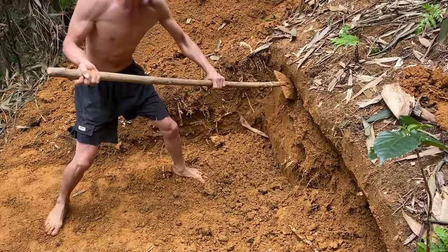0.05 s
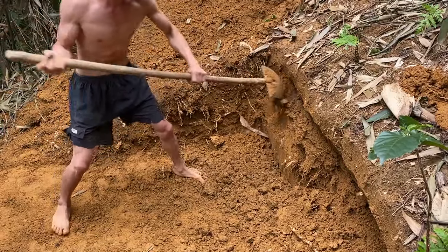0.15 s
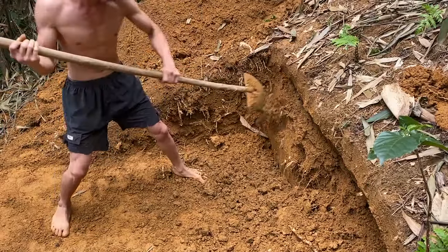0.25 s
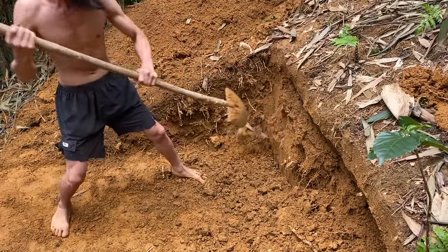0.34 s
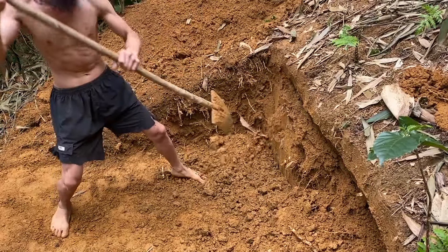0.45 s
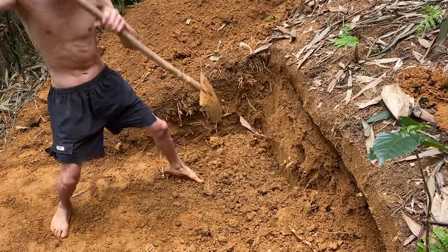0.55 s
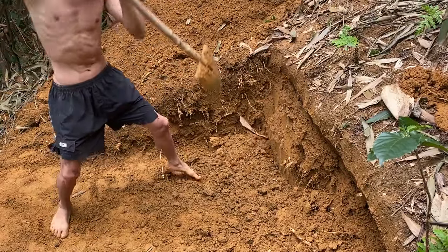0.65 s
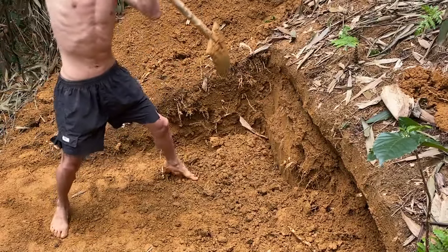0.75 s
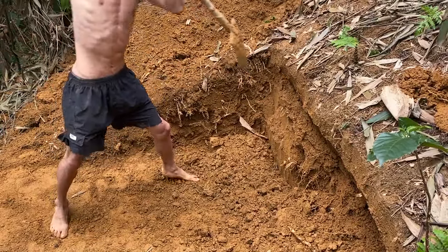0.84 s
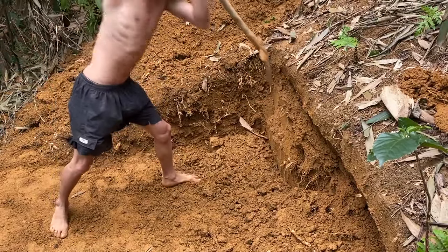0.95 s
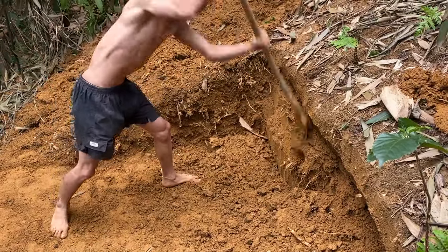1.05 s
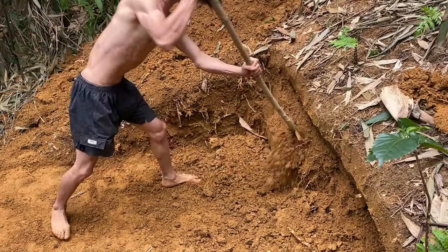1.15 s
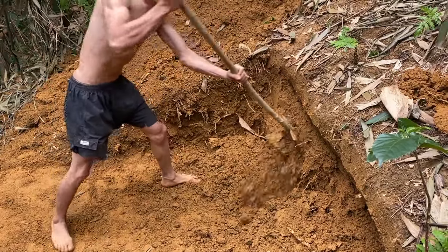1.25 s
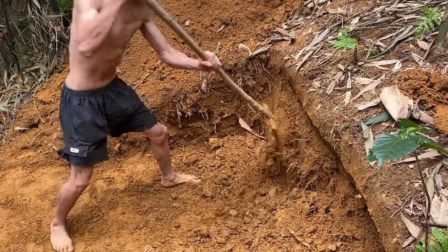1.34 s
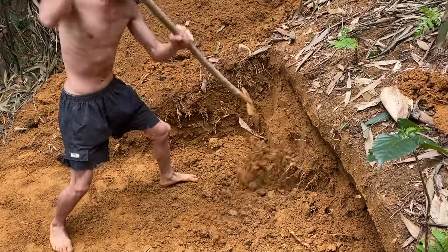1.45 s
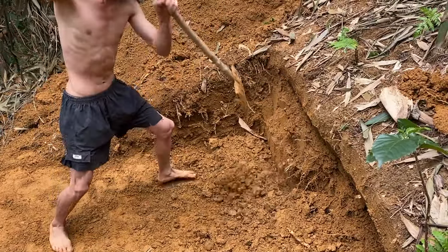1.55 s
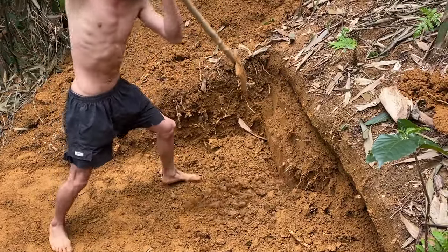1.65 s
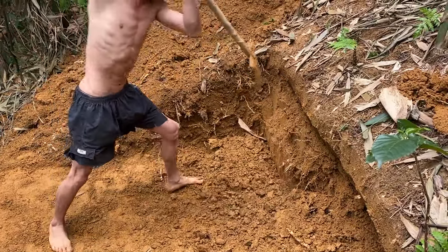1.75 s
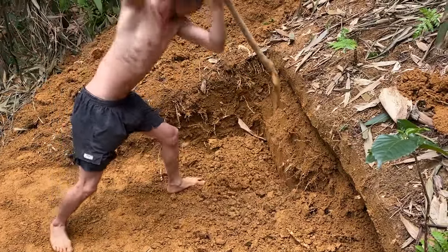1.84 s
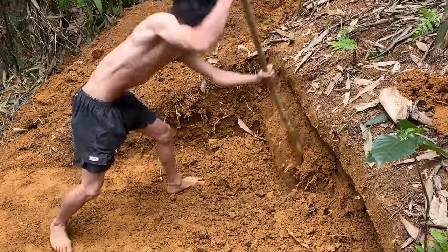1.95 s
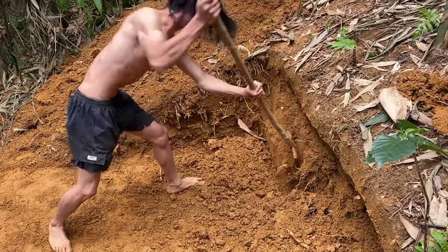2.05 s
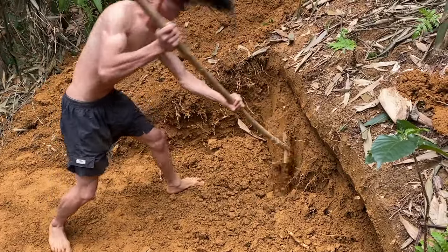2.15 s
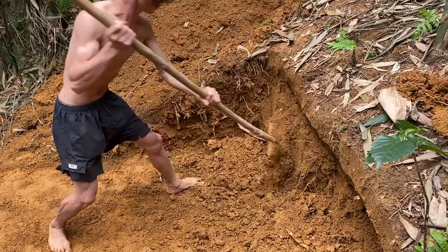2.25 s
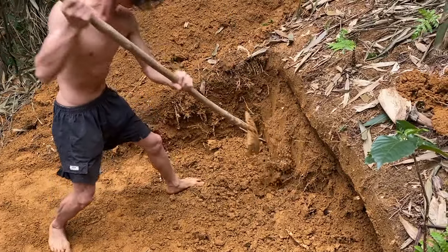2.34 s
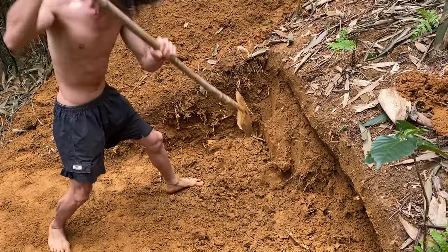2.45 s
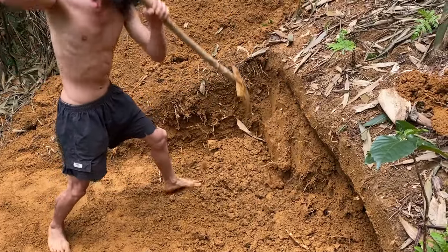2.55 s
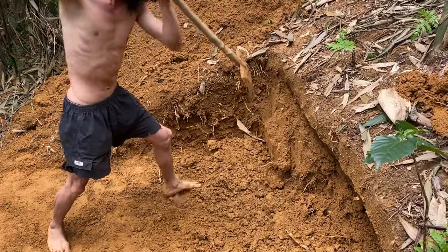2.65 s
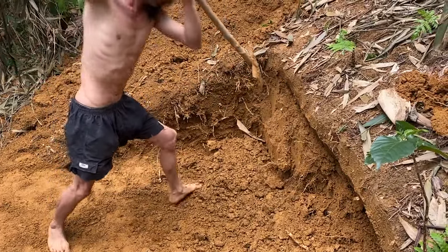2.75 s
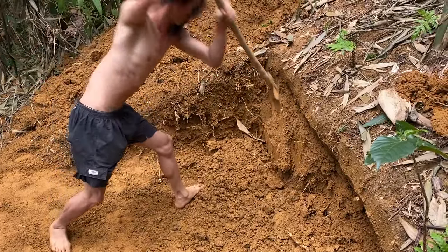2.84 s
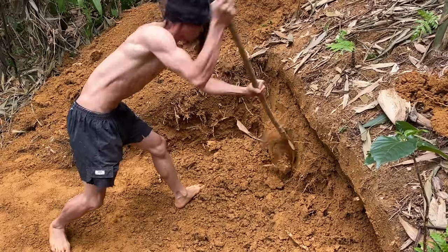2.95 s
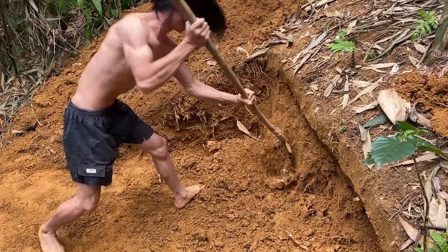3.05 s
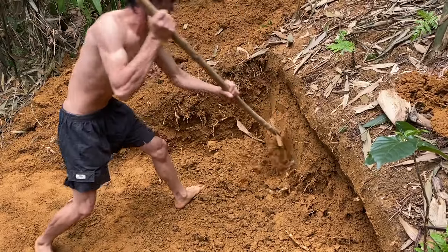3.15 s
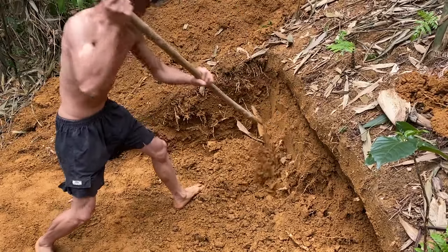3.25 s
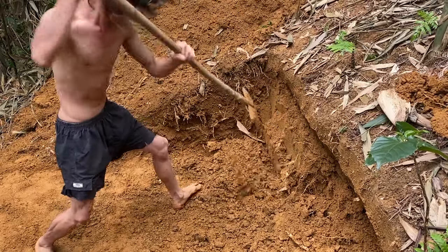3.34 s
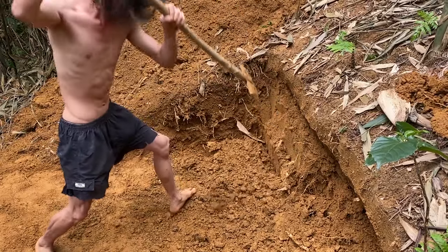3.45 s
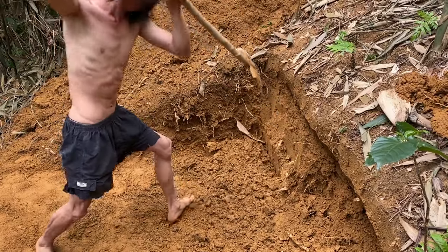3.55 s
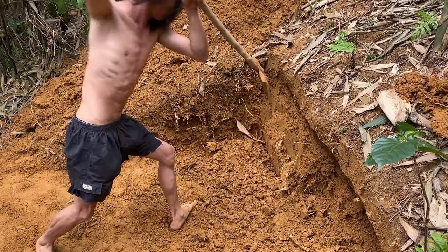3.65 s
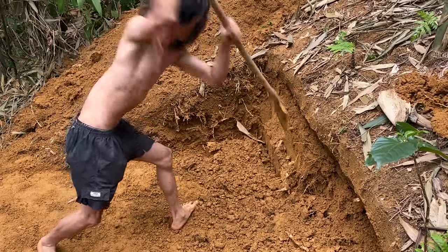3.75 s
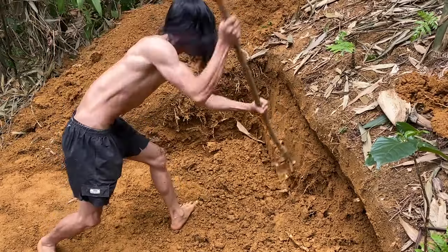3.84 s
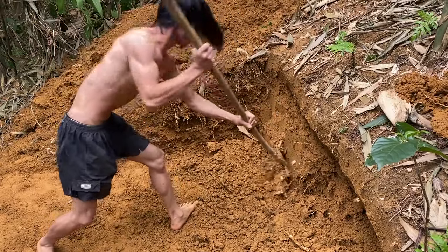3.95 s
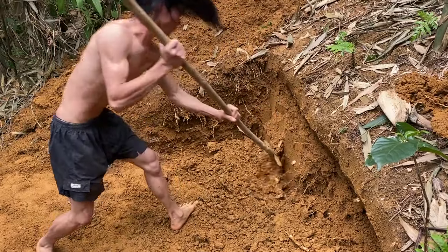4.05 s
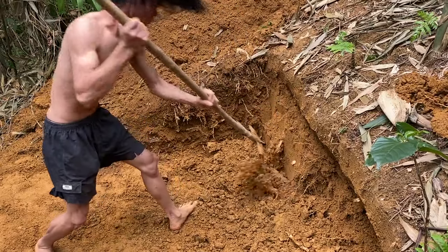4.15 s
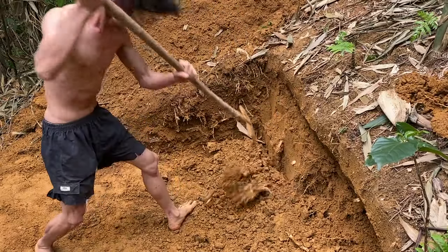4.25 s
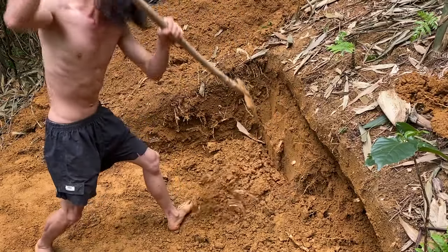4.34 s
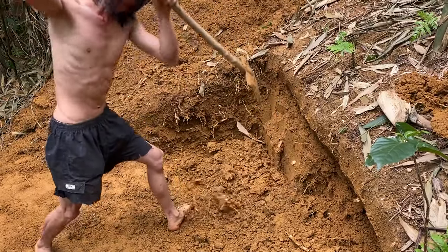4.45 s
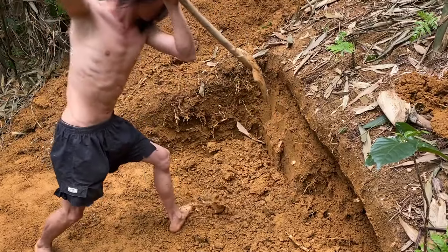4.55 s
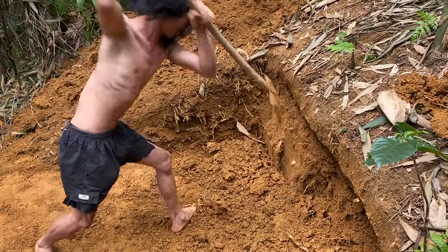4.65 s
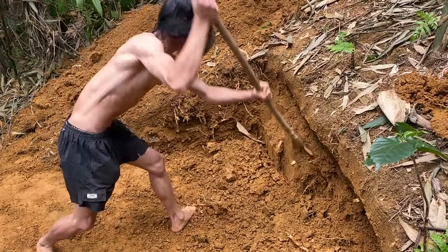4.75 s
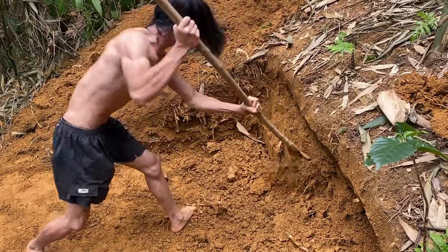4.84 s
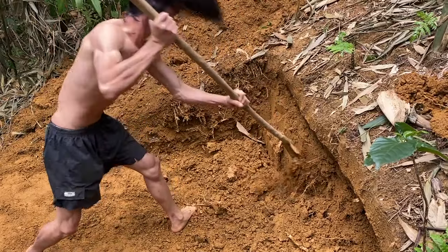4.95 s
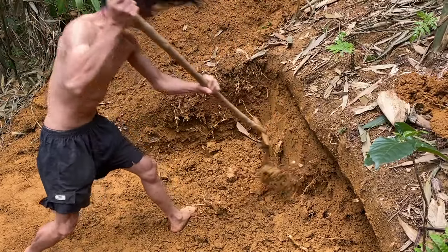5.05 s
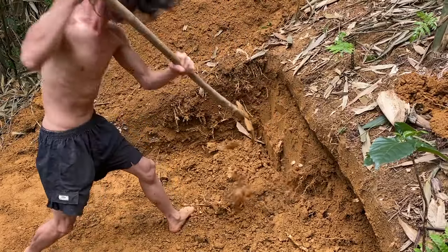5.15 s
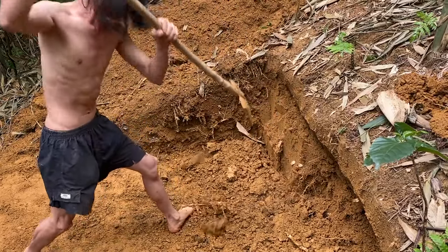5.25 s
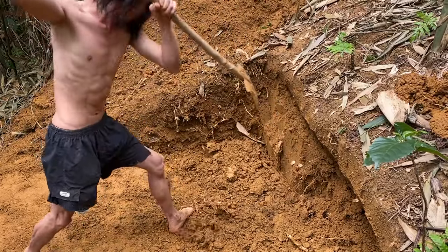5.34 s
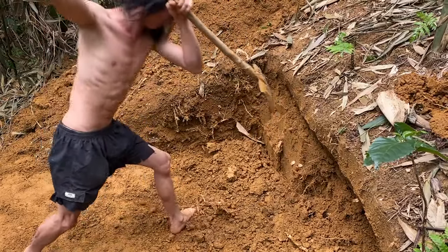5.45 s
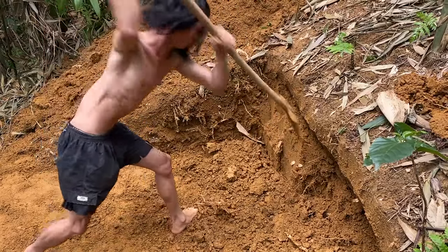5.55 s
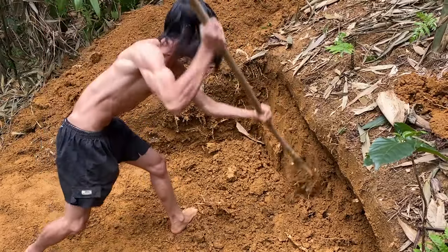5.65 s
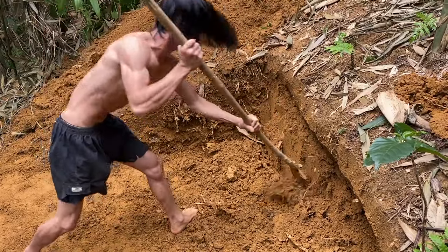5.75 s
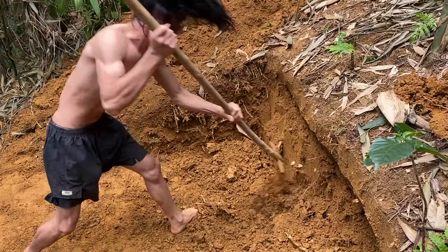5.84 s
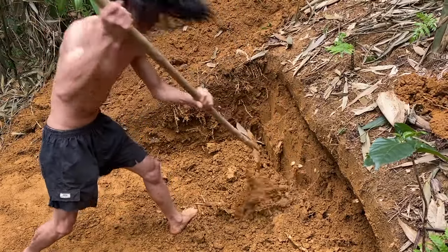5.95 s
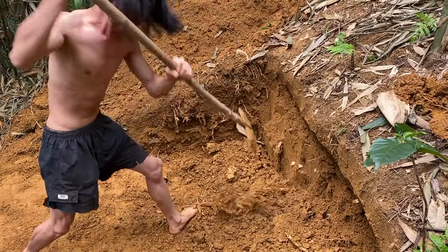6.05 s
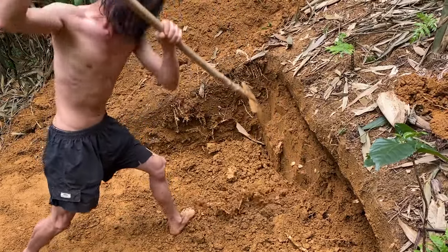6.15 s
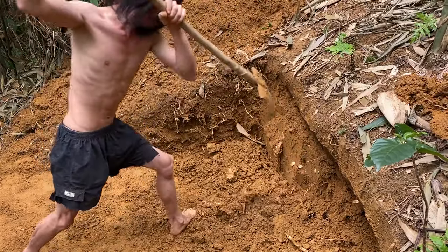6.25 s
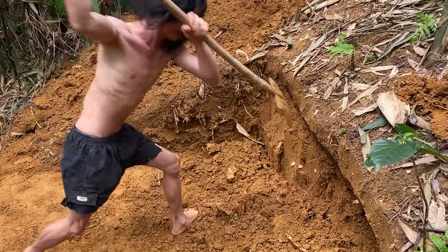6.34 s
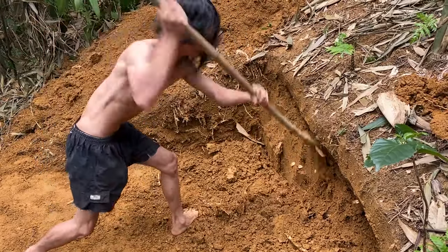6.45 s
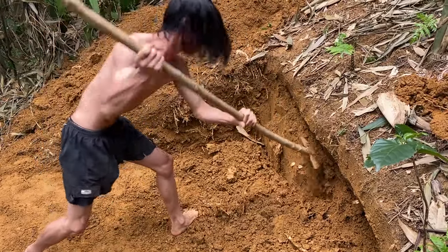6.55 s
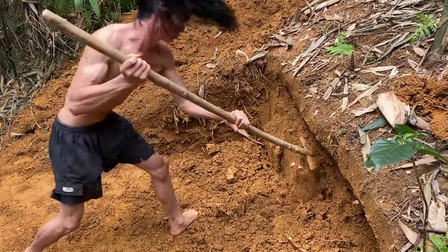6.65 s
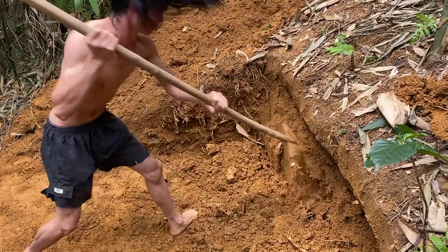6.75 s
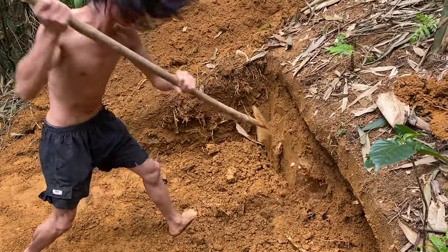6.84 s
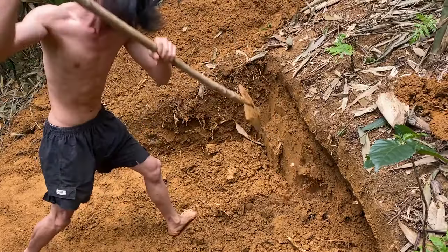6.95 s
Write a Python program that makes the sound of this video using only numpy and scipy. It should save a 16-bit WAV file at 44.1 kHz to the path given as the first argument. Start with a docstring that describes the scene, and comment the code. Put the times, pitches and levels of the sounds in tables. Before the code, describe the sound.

A long-handled hoe strikes packed earth about once a second, each blow a gritty crack and dull thud, loose soil trickling, faint forest hiss behind.

```python
"""In a forest, a long-handled hoe chops into a bank of packed earth near a two-port microphone.
Each blow mixes crackling soil (shaped noise), short cracks (noise and a brief tone), a knock of the
blade (ringing modes) and a thud through the ground (a sinking low tone with a rumble of noise).
Loose soil slides and clods drop after it. Behind, low air buffets the ports, leaves hiss far off
and an insect's buzz swells and stops (all shaped noise)."""
import sys
import numpy as np
from scipy import signal
from scipy.fft import rfft, irfft, next_fast_len
from scipy.io import wavfile
from scipy.ndimage import uniform_filter1d, map_coordinates

SR = 44100
rng = np.random.default_rng(int(sys.argv[2]) if len(sys.argv) > 2 else 0)


def to_wav(s):
    """Save 16-bit WAV."""
    ch = np.atleast_2d(s).T  # columns
    pcm = np.round(np.clip(ch, -1, 1) * 32767)  # PCM
    wavfile.write(sys.argv[1], SR, pcm.astype(np.int16))


N = 308700  # samples: 7 seconds

# Levels in the tables are relative: each source sets its final loudness in its function.
# bursts of breaking or sliding soil: peak t/s, rise t/s, grit level/dB, clods level/dB, grit's 60 dB decay t/s
SOIL_BURSTS = [(0.001, .01, -35, -31, 0.1), (0.088, .006, -42, -38, 0.41), (0.115, .025, -40, -39, 0.48),
               (0.214, .005, -45, -42, 0.46), (0.242, .025, -45, -43, 0.32),
               (0.286, 0.015, -50.5, -48.5, 0.8), (0.462, .008, -48, -47, 0.39),
               (0.506, 0.015, -37.5, -36, 0.1), (0.6, .03, -54, -62, 0.71), (0.67, .05, -57, -56, 0.11),
               (1.137, 0.024, -32.5, -32, 0.17), (1.377, 0.17, -51.5, -49, 0.18),
               (2.02, 0.014, -36, -38.5, 0.24), (2.034, 0.0082, -29, -22, 0.13),
               (2.276, 0.018, -36.5, -42.5, 0.12), (2.996, .008, -37, -36.5, 0.36),
               (3.029, 0.04, -34, -26.5, 0.054), (3.18, 0.055, -46, -50.5, 0.49),
               (3.889, 0.0089, -35.5, -33, 0.31), (3.903, 0.0083, -13, -14, 0.061),
               (3.921, .012, -30, -39, 0.13), (4.134, 0.071, -51.5, -72, 0.045),
               (4.812, 0.0054, -32, -29, 0.24), (4.849, 0.018, -38.5, -23, 0.11),
               (4.995, 0.08, -56, -57.5, 0.53), (5.68, .005, -48, -38, 0.21),
               (5.698, 0.018, -20.5, -26, 0.093), (5.735, 0.022, -38.5, -40, 0.25),
               (5.76, 0.05, -46, -33, 0.07), (6.547, 0.0074, -32, -21.5, 0.1),
               (6.529, .008, -41.5, -37.5, .4), (6.774, 0.05, -46, -49.5, 0.21)]
# breaking stones, roots and crust: t/s, level/dB, f/Hz, fizz against snap level/dB,
# left-right level/dB (half of it is applied)
FRACTURES = [(0.0858, -29, 2980, -17, -2), (0.092, -24, 4550, -28, -4), (0.1064, -24, 3020, -30, -10),
             (0.1164, -24.5, 5450, -32, -2), (0.128, -27, 4970, -20, -3), (0.147, -29, 4340, -21, -4),
             (0.212, -23.5, 1860, -21, -2), (0.242, -24, 1820, -28, -.5), (0.2527, -30, 3770, -28, -4),
             (0.5019, -29.5, 2930, -28, -3), (1.13, -22, 2990, -21, 2.5), (1.1341, -18, 1700, -24, -3),
             (1.1454, -19.5, 1560, -24, 5), (2.0074, -32, 2870, -18, 1), (2.0188, -20.5, 1660, -14, 5),
             (2.0328, -22.5, 1520, 1.5, 0), (2.0351, -13, 4440, -10, -5), (2.044, -15.5, 4250, -19, 0),
             (2.2739, -22.5, 3400, -19, 1), (2.2779, -12.5, 5410, -5, -6), (2.329, -34, 1670, -18, 7),
             (2.9938, -19, 1620, -16, 3.5), (2.9983, -22, 3300, -3, -2), (3.0062, -21, 2180, -7, 1.5),
             (3.0178, -17, 1640, -5, -3), (3.027, -9, 5120, -15, -4), (3.0318, -26, 3100, 4, .5),
             (3.1743, -41.5, 3020, 5.5, -1), (3.2018, -36, 2210, -6, 1), (3.246, -37.5, 1700, -26, 4),
             (3.8868, -22, 2270, -30, 3), (3.898, -23, 1500, -20, 0), (3.9005, -8.5, 3810, -8.5, 0),
             (3.9081, -12.5, 2400, -9, -17), (3.9203, -9, 5470, -15, -2), (3.9332, -18, 4900, -11, 0),
             (4.0902, -36, 2330, -16, .5), (4.1313, -37, 4450, -20, -.5), (4.81, -21.5, 3960, -16, 1.5),
             (4.8131, -19.5, 1790, -4.5, -1), (4.83, -22, 1770, -27, 0), (4.8464, -12, 1400, -28, 10),
             (4.852, -19, 1770, -15, -3), (4.9897, -36, 1700, -20, 2), (5.678, -27.5, 2310, -14, 2),
             (5.69, -16.5, 2180, -18, 3), (5.6937, -17, 2020, -26, 10), (5.6965, -9, 3800, -29, -.5),
             (5.7028, -7.5, 4770, -28, 0), (5.712, -16.5, 1640, -22, 5), (5.7312, -17, 3420, -20, 4),
             (5.7412, -18, 1580, -18, 2), (5.7555, -22, 2470, -22, 2), (6.525, -31, 2400, -11, 0),
             (6.5312, -26, 2000, -14, 1), (6.5377, -32, 1590, -22, 4), (6.5439, -15.5, 1450, -13, 6),
             (6.5476, -12, 1680, -14, -8), (6.777, -25.5, 1820, -8.5, 1)]
# blows that set the blade ringing: t/s, level/dB
BLADE_KNOCKS = [(0.088, -29.5), (0.212, -40), (0.505, -30), (1.125, -41), (1.136, -20), (1.14, -19.5),
                (2.019, -21.5), (2.03, -14.5), (2.035, -15), (2.998, -23), (3.016, -20.5), (3.025, -22),
                (3.888, -26), (3.896, -21), (3.904, -12), (4.812, -25.5), (4.831, -23), (4.845, -18),
                (5.693, -16.5), (5.747, -24.5), (5.758, -21), (6.532, -31), (6.544, -20.5), (6.548, -19)]
# ringing modes of the blade: f/Hz, width f/Hz, level/dB
BLADE_MODES = [(265, 53, -13.5), (725, 79, 8), (970, 117, -0.5), (1273, 140, 2), (1770, 670, -4),
               (2450, 180, 1)]
# clods landing on loose soil: t/s, level/dB
CLOD_LANDINGS = [(0.284, -37), (0.409, -41.5), (0.458, -39), (0.535, -51), (0.588, -50), (0.634, -44.5),
                 (0.663, -38.5), (0.799, -49), (1.331, -41.5), (1.783, -46.5), (2.281, -45), (2.472, -38.5),
                 (2.699, -40), (3.145, -37), (3.158, -46), (3.205, -46), (5.851, -40.5)]
# pushes through the ground as the blade stops: t/s, level/dB, settled f/Hz, 60 dB decay t/s
GROUND_THUDS = [(0.007, -26.5, 59.7, 0.066), (1.152, -26, 98, 0.056), (1.349, -42.5, 139, 0.11),
                (2.038, -20, 84, 0.063), (2.054, -25, 59.6, 0.12), (2.288, -41.5, 88, 0.049),
                (3.024, -19.5, 46, 0.046), (3.034, -27, 115, 0.086), (3.916, -24.5, 94, 0.064),
                (3.942, -30, 61.9, 0.071), (4.834, -23, 66, 0.12), (4.853, -29, 60.4, 0.065),
                (5.704, -24.5, 96.9, 0.11), (5.776, -37, 59, 0.12), (6.556, -27, 46.3, 0.054),
                (6.558, -31.5, 111, 0.08)]
# tone colour of fine grit: f/Hz, level/dB
GRIT_COLOUR = [(800, 0.5), (2000, -0.5), (3200, 0.5), (4800, 0.5), (6200, -3.5), (8000, -3), (11000, -8),
               (15500, -11)]
# tone colour of crumbling clods: f/Hz, level/dB
CLOD_COLOUR = [(100, -8.5), (250, 2.5), (480, -5.5), (730, -4), (1300, -10), (2000, -9.5), (4000, -32)]
# how the bank reaches the two ports: f/Hz, left-right level/dB
LEFT_LOUDER = [(60, 16), (150, 2.5), (380, -0.5), (950, 5.5), (2380, 1.5), (5980, -0.5), (15000, 2.5)]
# how far the left port leads the right one: f/Hz, phase/rad
LEFT_LEAD = [(60, -0.2), (860, 0.5), (2150, 1.5), (4100, 0.37), (6700, 1.5), (9100, -5), (11200, -5),
             (13300, -10), (15500, -13.5)]
# puffs of air on the ports: peak t/s, level/dB, half length t/s
AIR_PUFFS = [(0.342, -51, .08), (0.532, -50, 0.056), (1.948, -39, 0.017), (2.117, -32.5, 0.042),
             (2.505, -41, 0.047), (2.67, -49, .09), (2.846, -52, 0.052), (3.23, -40, 0.088),
             (3.318, -41, 0.015), (3.442, -39.5, 0.073), (3.777, -52, 0.22), (4.231, -43, 0.034),
             (4.577, -50, 0.064), (4.674, -46, 0.023), (4.755, -43, 0.022), (5.112, -56, 0.074),
             (5.232, -44, 0.057), (5.443, -41.5, 0.056), (5.583, -36, 0.057), (5.76, -33, 0.064),
             (5.93, -46.5, 0.074), (6.072, -35, 0.035), (6.117, -36, .06), (6.183, -29.5, 0.031),
             (6.265, -35.5, 0.028), (6.369, -38.5, 0.04), (6.434, -28.5, 0.052), (6.526, -40, .05),
             (6.582, -37, 0.079), (6.654, -37.5, 0.067), (6.768, -41, 0.046), (6.97, -32.5, 0.069)]
# low air between the puffs: t/s, level/dB
AIR_BREEZE = [(0.0, -60), (0.92, -55), (2.9, -55.5), (3.25, -49), (3.55, -55), (4.25, -51), (5.83, -44),
              (6.14, -56), (6.49, -47.5), (7.0, -56)]
# tone colour of the buffeting air: f/Hz, level/dB
AIR_COLOUR = [(12, -40), (20, 4.5), (66, -0.5), (80, -7), (205, -29.5), (250, -27), (320, -48), (550, -120)]
# tone colour of the leaves: f/Hz, level/dB
LEAF_COLOUR = [(60, 0), (150, -2.5), (300, -6), (700, -9), (1100, -13), (2400, -10), (3300, -13.5),
               (4100, -12.5), (4600, -8), (5200, -14.5), (6300, -16.5), (10000, -19), (15500, -26.5)]
# far sound at the two ports: f/Hz, left-right likeness (1 same, -1 opposite; limited to that range)
FAR_LIKENESS = [(60, 0.62), (250, 0.88), (600, -0.19), (1500, -0.13), (3100, 0.28), (5500, 0.04),
                (7000, 0.54), (8000, 0.77), (9100, -1.95), (10000, -0.37), (11000, 0.8), (12200, -0.051),
                (13300, -1.2), (14400, 0.37), (15500, 0.74)]

RISE_DB = 26  # climb of a soil burst over its rise
CLODS_SHORTER = 0.58  # clods die in this share of the grit's time
TRICKLE_DB, TRICKLE_T60_S = -25, 0.23  # loose grit after a burst: level against the burst, decay
CRACK_T60_S, FIZZ_T60_S = 0.012, 0.0086
PUSH_S = 0.0026  # time for the push on the blade to fall to about a third
DROP_T60_S = 0.048
SHAKE_DB, SHAKE_T60_S = -13, 0.13  # ground rumble after a thud: level against the thud, decay
PUFF_DB = 20  # fall from a puff's peak over its half length
SONG_END_S, SONG_EVERY_S = 0.52, 1.565  # the insect's first stop, time from stop to stop
STOP_S = 0.064  # time for the insect to fall by 60 dB
SONG_DB, SWELL_DB_PER_S = -60, 25  # the buzz: level at a stop, swell towards it
DRONE_DB, DRONE_DB_PER_S = -72, 7  # the thin note: level at a stop, swell towards it
BUZZ_HZ, BUZZ_WIDTH_HZ, DRONE_HZ, DRONE_WIDTH_HZ = 9600, 1700, 9570, 200
LOW_CUT_HZ, TOP_HZ = 32, 16000


def amp(db):
    """Turn a level in dB into a gain."""
    return 10 ** (np.asarray(db) / 20)


def unit(x):
    """Scale x to an average (rms) strength of 1."""
    return x / np.sqrt(np.mean(x ** 2) + 1e-20)


def decay(t, t60):
    """Die away by 60 dB in t60 seconds."""
    return amp(-60 * t / t60)


def onset(t, seconds):
    """Start softly from silence instead of with a click."""
    return 1 - np.exp(-t / seconds)


def along(points, hz):
    """Read a curve of (Hz, value) points on a log frequency axis."""
    f, v = np.transpose(points)
    return np.interp(np.log(hz + 1), np.log(f + 1), v)


def colour(points):
    """Make a filter from a table of levels over frequency."""
    return lambda hz: amp(along(points, hz))


def wobble(rate):
    """Draw a smooth random curve with rate knots a second."""
    knots = rng.standard_normal(int(N * rate / SR) + 4)
    return map_coordinates(knots, [np.arange(N) * rate / SR])


def filtered(x, response):
    """Filter x by a function of frequency that gives gain and phase."""
    m = next_fast_len(N + 8192)  # room for the filter to ring past the end
    return irfft(rfft(x, m) * response(np.fft.rfftfreq(m, 1 / SR)), m)[..., :N]


def resonance(f, hz, width):
    """One ringing mode: strongest at hz, and shorter when its width is larger."""
    return 1j * f * width / (hz * hz - f * f + 1j * f * width)


def bursts():
    """Each soil burst climbs, breaks and dies, and loose grit trickles after it."""
    grit, clods = np.zeros((2, N))
    for s, rise, grit_db, clods_db, t60 in SOIL_BURSTS:
        first = max(round((s - rise) * SR), 0)
        t = np.arange(first, min(first + SR, N)) / SR - s
        climb = amp(RISE_DB * np.minimum(t, 0) / rise)
        after = np.maximum(t, 0)
        trickle = amp(TRICKLE_DB) * decay(after, TRICKLE_T60_S)
        grit[first:first + SR] += climb * amp(grit_db) * (decay(after, t60) + trickle)
        clods[first:first + SR] += climb * amp(clods_db) * decay(after, CLODS_SHORTER * t60)
    return grit, clods


def grains(spectrum, per_second, spread_db, smooth):
    """Soil breaks in random snaps of nearly equal size, on a bed of fine noise."""
    chance = rng.random((3, N))
    happens = chance[0] < per_second / SR
    size = amp(-spread_db * np.log(chance[2] + 0.1))
    snaps = happens * np.sign(chance[1] - 0.5) * size
    mix = unit(snaps) + smooth * rng.standard_normal(N)
    return unit(filtered(mix, colour(spectrum)))


def packed(gain, full_db):
    """Packed soil yields less and less under the full blow, so its gain levels off at full_db."""
    return gain / (1 + gain / amp(full_db))


def soil():
    """Fine grit crackles high and clods crumble low, both in the same uneven lumps."""
    grit, clods = bursts()
    lumps = wobble(200)
    crackle = unit(amp(1.64 * lumps) * grains(GRIT_COLOUR, 1800, spread_db=1.5, smooth=0.48))
    crumble = unit(amp(3.1 * lumps) * grains(CLOD_COLOUR, 600, spread_db=0.5, smooth=0.61))
    fine = packed(grit, full_db=-10.5) * crackle
    coarse = packed(clods, full_db=-16.0) * crumble
    return amp(-2.5) * fine + amp(-1.0) * coarse


def cracks():
    """A fracture is a dying burst of noise and tone around its own pitch, with a fizz above."""
    snaps, fizz = np.zeros((2, 2, N + SR))
    t = np.arange(2048) / SR
    f = np.fft.rfftfreq(len(t), 1 / SR)
    for s, db, hz, fizz_db, pan_db in FRACTURES:
        at = round(s * SR)
        side = amp([[pan_db / 4], [-pan_db / 4]])
        noise = rng.standard_normal((2, len(t)))
        crunch = unit(irfft(rfft(noise[0]) * resonance(f, hz, 0.81 * hz)))
        # the first break is one clean snap that rings briefly
        snap = 0.72 * crunch + 0.77 * np.sin(2 * np.pi * hz * t)
        fade = amp(db) * decay(t, CRACK_T60_S) * onset(t, 0.00076)
        fizz_fade = amp(db + fizz_db) * decay(t, FIZZ_T60_S) * onset(t, 0.00042)
        snaps[:, at:at + len(t)] += side * fade * snap
        fizz[:, at:at + len(t)] += side * fizz_fade * noise[1]
    bright = filtered(fizz[:, :N], lambda hz: resonance(hz, 9600, 11000) ** 2)
    return amp(-2) * snaps[:, :N] + amp(9) * bright


def blade():
    """A rough, dying push drives the soil-damped modes of the steel."""
    force, t = np.zeros(N + SR), np.arange(SR // 20) / SR
    for s, db in BLADE_KNOCKS:
        push = rng.standard_normal(len(t)) * np.exp(-t / PUSH_S)
        push[:24] += 2.5 * np.hanning(24)  # a smooth first nudge of about half a millisecond
        force[round(s * SR):][:len(t)] += amp(db) * push / np.linalg.norm(push)

    def steel(f):
        """Add up the modes, every second one pushing the opposite way."""
        return sum((-1) ** k * amp(db) * resonance(f, hz, width)
                   for k, (hz, width, db) in enumerate(BLADE_MODES))
    return amp(19.0) * filtered(force[:N], steel)


def drops():
    """A clod breaks on loose soil: a dull, rough knock whose pitch sags as it sinks in."""
    out, t = np.zeros(N + SR), np.arange(2048) / SR
    f = np.fft.rfftfreq(len(t), 1 / SR)
    # the pitch sags from about 1290 Hz to 226 Hz
    cycles = 225.72 * t + 2.45241 * onset(t, 0.0023)
    fade = amp(-0.5) * decay(t, DROP_T60_S) * onset(t, 0.00069)
    for s, db in CLOD_LANDINGS:
        crumbs = unit(irfft(rfft(rng.standard_normal(len(t))) * resonance(f, 600, 1130) ** 2))
        knock = np.sin(2 * np.pi * cycles) + 0.38 * crumbs
        out[round(s * SR):][:len(t)] += amp(db) * fade * knock
    return out[:N]


def ports(x, diffuse_db):
    """A near source reaches the ports with unlike level and phase; the bank scatters a little of it."""
    def left_and_right(hz):
        """Give half of the difference to each port."""
        half = amp(along(LEFT_LOUDER, hz) / 2) * np.exp(0.5j * along(LEFT_LEAD, hz))
        return np.array([half, 1 / half])
    direct = filtered(x, left_and_right)
    t = np.arange(SR // 10) / SR
    tail = rng.standard_normal((2, len(t))) * decay(t, 0.013)
    scatter = signal.fftconvolve(x, tail / np.linalg.norm(tail[0]), axes=1)[:, :N]
    return direct + amp(diffuse_db) * filtered(scatter, lambda hz: resonance(hz, 2060, 3100))


def thuds():
    """The packed ground swings and dies away, sinking in pitch, and rumbles on."""
    ground, shake = np.zeros((2, N + SR))
    t = np.arange(SR // 2) / SR
    for s, db, hz, t60 in GROUND_THUDS:
        at = round(s * SR)
        start = amp(db + 7.5) * onset(t, 0.0021)
        phase = 2 * np.pi * hz * (t + 0.0025 * onset(t, 0.04))  # begins about 6 % sharp
        ground[at:][:len(t)] += start * decay(t, t60) * np.sin(phase)
        shake[at:][:len(t)] += start * amp(SHAKE_DB) * decay(t, SHAKE_T60_S)
    rumble = unit(filtered(rng.standard_normal(N), lambda hz: resonance(hz, 55, 47) ** 2))
    return ground[:N] + shake[:N] * rumble


def gusts():
    """A wavering breeze, with puffs that swell and fade alike."""
    t = np.arange(N) / SR
    puffs = sum(amp(db - PUFF_DB * ((t - s) / half) ** 2) for s, db, half in AIR_PUFFS)
    breeze_s, breeze_db = np.transpose(AIR_BREEZE)
    breeze = amp(np.interp(t, breeze_s, breeze_db))
    return puffs + breeze * amp(-3.0 + 5.3 * wobble(8.8))


def buffet():
    """Slow eddies press on both ports almost alike, as low noise with its swings evened out."""
    eddies = filtered(rng.standard_normal((2, N)), colour(AIR_COLOUR))
    size = np.abs(signal.hilbert(eddies[0]))
    evened = eddies[0] / (size + 1.25 * size.mean())
    common = unit(filtered(evened, lambda hz: resonance(hz, 52.8, 115) ** 2))
    apart = amp(-14) * unit(eddies[1])
    return amp(0.5) * gusts() * (common + [apart, -apart])


def far(pair):
    """Far sound is partly alike at the ports: blend a shared noise with an opposed one by frequency."""
    def blend(hz):
        """The likeness sets the shares of the shared and the opposed noise."""
        turn = np.arccos(np.clip(along(FAR_LIKENESS, hz), -1, 1)) / 2
        return np.array([np.cos(turn), np.sin(turn)])
    mid, side = filtered(pair, blend)
    return np.array([mid + side, mid - side])


def leaves():
    """Far leaves hiss: noise made uneven in soft patches of time and pitch."""
    z = signal.stft(rng.standard_normal((2, N)), nperseg=512)[2]
    field = uniform_filter1d(rng.standard_normal(z.shape[1:]), size=8, axis=0)  # smooth over pitch
    field = uniform_filter1d(field, size=16, axis=1)  # smooth over time
    patchy = signal.istft(z * amp(0.84 * unit(field)), nperseg=512)[1][:, :N]
    hiss = unit(far(filtered(patchy, colour(LEAF_COLOUR))))
    return amp(-54 + 0.33 * wobble(1.3)) * hiss


def song(stop_db, swell_db_per_s):
    """The insect swells steadily, stops short and starts again."""
    since = (np.arange(N) / SR - SONG_END_S) % SONG_EVERY_S
    swell = amp(-swell_db_per_s * (SONG_EVERY_S - since))
    return amp(stop_db) * (swell + decay(since, STOP_S))


def insect():
    """A wide band of noise buzzes over a thin, narrow one."""
    noise = rng.standard_normal((2, 2, N))
    buzz = unit(filtered(noise[0], lambda hz: resonance(hz, BUZZ_HZ, BUZZ_WIDTH_HZ) ** 3))
    drone = unit(filtered(noise[1], lambda hz: resonance(hz, DRONE_HZ, DRONE_WIDTH_HZ) ** 2))
    return far(song(SONG_DB, SWELL_DB_PER_S) * buzz + song(DRONE_DB, DRONE_DB_PER_S) * drone)


def scene():
    """Hoe and soil near by, ground and air below, forest behind."""
    near = cracks() + soil() + blade() + drops()
    return ports(near, diffuse_db=-11) + thuds() + buffet() + leaves() + insect()


def record(dry):
    """The recorder cuts the lowest rumble and keeps nothing from its band limit up."""
    return filtered(dry, lambda hz: (1j * hz / (LOW_CUT_HZ + 1j * hz)) ** 3 * (hz < TOP_HZ))


dry = scene()
out = record(dry)
to_wav(out)
```